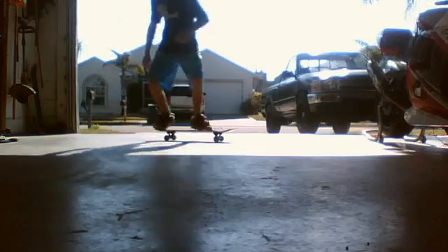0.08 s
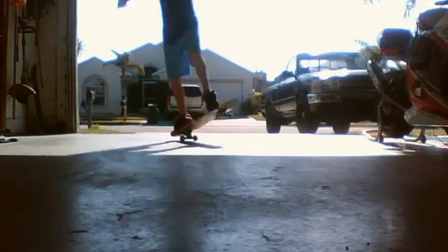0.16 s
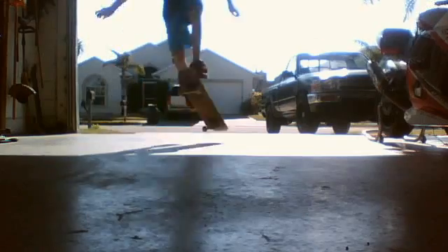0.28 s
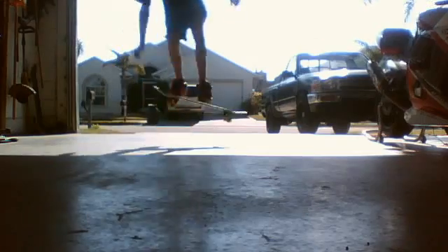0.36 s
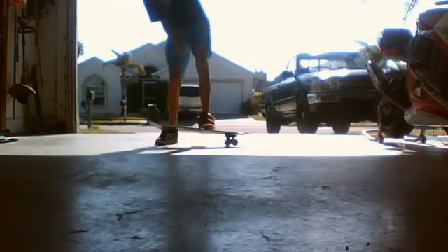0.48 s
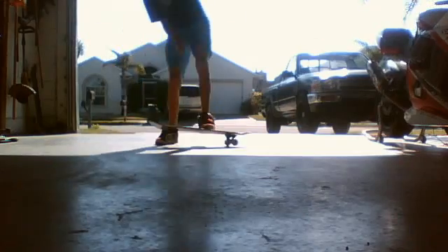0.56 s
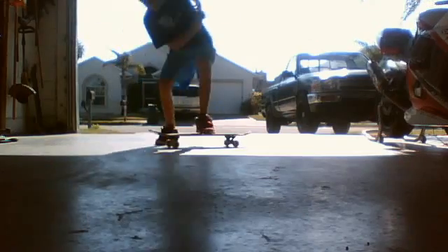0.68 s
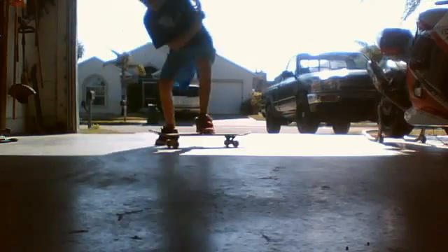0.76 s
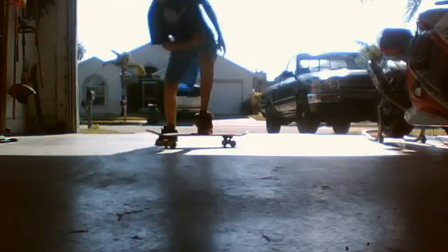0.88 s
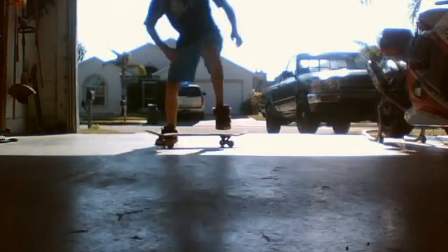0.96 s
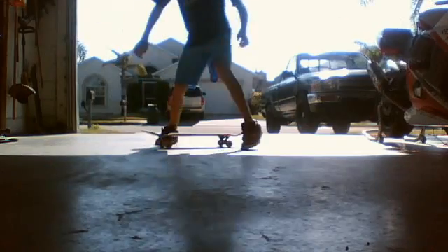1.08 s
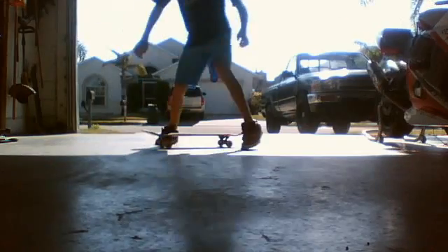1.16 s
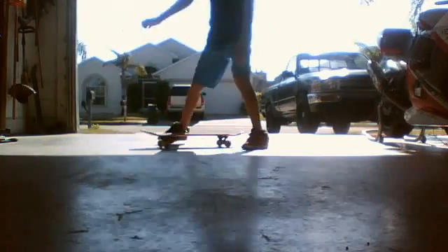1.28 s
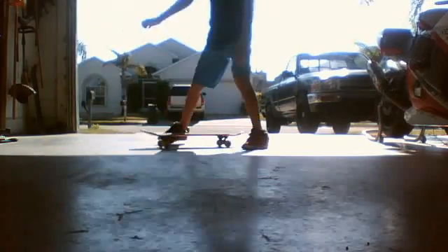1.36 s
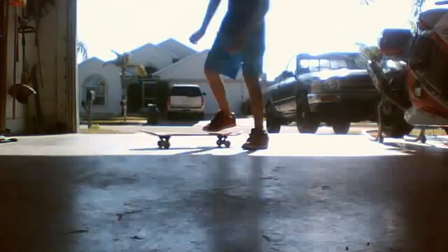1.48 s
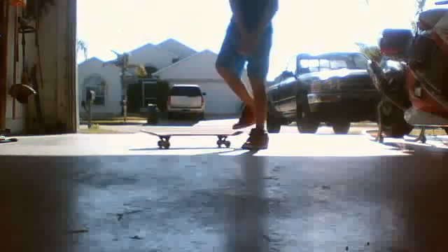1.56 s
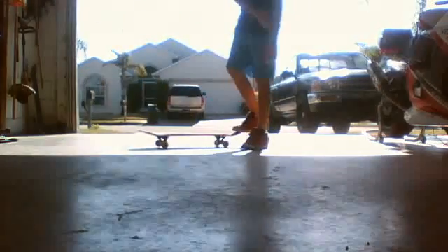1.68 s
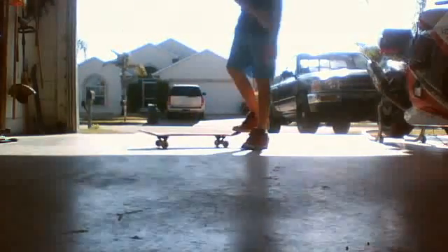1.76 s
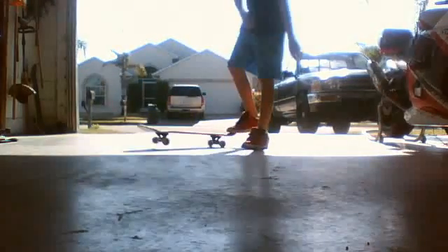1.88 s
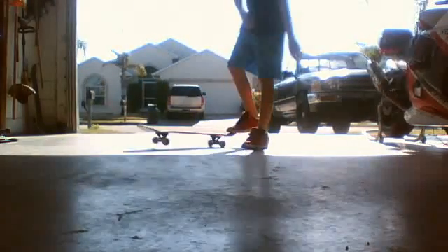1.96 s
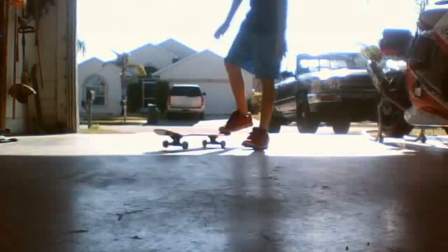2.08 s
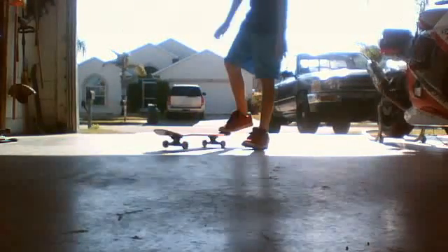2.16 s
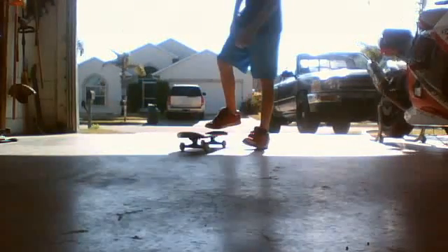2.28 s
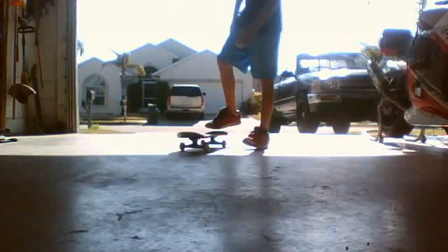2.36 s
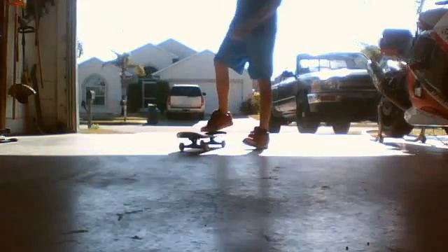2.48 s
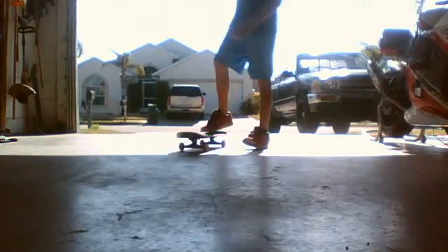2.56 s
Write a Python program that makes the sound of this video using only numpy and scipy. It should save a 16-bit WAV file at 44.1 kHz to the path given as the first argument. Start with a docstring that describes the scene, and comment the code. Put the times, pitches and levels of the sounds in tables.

```python
"""In an open concrete garage, a skateboard ollies: it rolls, the tail pops, the wheels slam down and clatter.
The rider steps off, scuffs the board round with a foot, and it slaps the floor once more.
Blows are filtered noise bursts plus decaying board modes; rolling and scraping are uneven, coloured noise.
The bare garage rings after each blow, the loud ones overload the microphone, and quiet outdoor air lies below."""
import sys
import numpy as np
from scipy import signal
from scipy.fft import rfft, irfft
from scipy.io import wavfile
from scipy.ndimage import uniform_filter1d

SR = 44100
rng = np.random.default_rng(int(sys.argv[2]) if len(sys.argv) > 2 else 0)


def int16_out(signal):
    """Quantize to a 16-bit WAV file."""
    q = np.round(np.clip(np.atleast_2d(signal).T, -1, 1) * 32767)
    wavfile.write(sys.argv[1], SR, q.astype(np.int16))


N = 114660  # length in samples, 2.6 s


def undb(db):
    """Decibels to gain."""
    return 10 ** (np.asarray(db) / 20)


def unit(x):
    """Scale to unit energy."""
    return x / np.sqrt(np.sum(x ** 2) + 1e-18)


def at(hz, table):
    """Read a table on a log-frequency axis."""
    f, v = np.array(table, float).T
    return np.interp(np.log(np.maximum(hz, 1)), np.log(f), v)


def swell(table):
    """Gain from a curve of seconds and dB, silent outside it."""
    s, db = np.array(table).T
    return np.interp(np.arange(N) / SR, s, undb(db), left=0, right=0)


def through(x, impulse):
    """Pass a sound through an impulse response, keeping its length."""
    return signal.fftconvolve(x, impulse)[:len(x)]


def response(colour, bright_hz=SR, size=2048):
    """Minimum-phase, unit-energy impulse response of a colour, dulled above bright_hz."""
    f = np.arange(size // 2 + 1) * SR / size
    gain = undb(at(f, colour)) / np.hypot(1, f / bright_hz)
    # Folding the cepstrum forward in time puts the energy right at the onset
    cepstrum = irfft(np.log(gain))
    cepstrum[1:size // 2] *= 2
    cepstrum[size // 2 + 1:] = 0
    return unit(irfft(np.exp(rfft(cepstrum))))


def add(out, s, x):
    """Mix a sound in at s seconds."""
    i = max(int(s * SR), 0)
    out[i:i + len(x)] += x[:N - i]


def blows(rows, colour, ring_db, chatter_db):
    """Each blow is a sharp push and a chatter of contacts, and rings the board, at a slightly new pitch each time."""
    # Modes of the board. Each row: frequency in Hz, relative level in dB, t60 in seconds
    modes = [(332.5, 5.5, 0.11), (570, -0.5, 0.086), (727, -4, 0.12), (790.2, 1, 0.2), (1097, 7, 0.073),
             (1589, -4, 0.1)]
    contact_rise_s = 0.0011
    out, t = np.zeros(N), np.arange(SR // 2) / SR
    rise = 1 - np.exp(-t / contact_rise_s)
    span = np.sqrt(.05 * SR)  # a 0 dB knock has unit RMS over 50 ms
    for s, db, bright_hz, chatter_s in rows:
        push = undb(chatter_db) * rng.standard_normal(len(t)) * np.exp(-t / chatter_s) * rise
        push[0] += 1
        knock = unit(through(push, response(colour, bright_hz)))
        ring = np.zeros(len(t))
        for hz, mode_db, t60 in modes:
            # Pitch and level of every mode are drawn afresh for each blow
            shifted_hz = hz * (1 + .025 * rng.standard_normal())
            envelope = undb(mode_db + 2 * rng.standard_normal() - 60 * t / t60)
            ring += envelope / np.hypot(1, hz / bright_hz) * np.sin(2 * np.pi * shifted_hz * t)
        add(out, s, span * undb(db) * (knock + undb(ring_db) * unit(ring * rise ** 2)))
    return out


def grains(colour, rough):
    """Dense contacts, more uneven in size the rougher the concrete, as coloured noise of unit RMS."""
    x = rng.standard_normal(N) * np.exp(rough * rng.standard_normal(N))
    return unit(through(x, response(colour))) * np.sqrt(N)


def grazes(rows, colour):
    """Short scrapes of grains, each starting at full level and falling along a bell curve."""
    level, t = np.zeros(N), np.arange(SR // 5) / SR
    for s, db, decay_s in rows:
        add(level, s, undb(db) * np.exp(-(t / decay_s) ** 2))
    return grains(colour, rough=0.17) * level


def landings():
    """Wheels clatter as the board comes down flat: low, dull knocks over the ringing board."""
    # Each row: start in seconds, level in dB, contact brightness in Hz, chatter decay in seconds
    wheel_hits = [(.512, 1, 1220, 0.004), (.537, 3.5, 1300, 0.0066), (.562, -4, 2030, 0.028),
                  (.612, -2.5, 2010, 0.016), (.635, -6.5, 1300, 0.0084), (.665, -8, 2980, 0.01)]
    # Colour of the wheel knocks. Each row: frequency in Hz, level in dB
    wheel_colour = [(60, -56), (140, -10), (220, -8.5), (320, -3.5), (660, 1), (1100, -3.5), (2000, -13.5),
                    (4000, -21), (8000, -32.5), (15000, -45)]
    return blows(wheel_hits, wheel_colour, ring_db=-8, chatter_db=-11)


def slaps():
    """Deck and trucks slap the floor: contacts brighter than those of the wheels."""
    # Each row: start in seconds, level in dB, contact brightness in Hz, chatter decay in seconds
    slap_hits = [(.5025, -1, 8000, 0.019), (.589, -1, 5070, 0.0096), (2.114, -16.5, 9000, 0.0074),
                 (2.122, -4.5, 6000, 0.0046), (2.136, -11, 6000, 0.006), (2.151, -7.5, 3560, 0.0062),
                 (2.19, -19, 4000, 0.008)]
    # Colour of the slaps. Each row: frequency in Hz, level in dB
    slap_colour = [(60, -59.5), (200, -16.5), (330, 6), (440, -11), (700, 8.5), (930, -5.5), (1650, -2.5),
                   (2300, -10.5), (2900, -12.5), (3400, -19.5), (4800, -22.5), (7000, -30), (10000, -37),
                   (15000, -65)]
    return blows(slap_hits, slap_colour, ring_db=-11.5, chatter_db=-12.5)


def pop():
    """The tail pops off the floor with strong chatter; the board grazes the concrete brightly."""
    # Tail blows. Each row: start in seconds, level in dB, contact brightness in Hz, chatter decay in seconds
    pop_hits = [(.206, -12.5, 880, 0.06), (.2305, -0.5, 7900, 0.0074), (.268, -10, 1800, 0.0012),
                (.294, -19.5, 1800, 0.0024)]
    # Colour of the tail blows. Each row: frequency in Hz, level in dB
    pop_colour = [(140, -24), (270, 2.5), (560, 3.5), (670, 2), (830, 7), (1100, -3.5), (1600, -1.5),
                  (2100, -11), (3300, -13), (6000, -30), (15000, -64)]
    # Board grazing the concrete at the pop, then a faint bright rattle after the late slap. Each row: start in
    # seconds, level in dB, decay in seconds
    graze_hits = [(.221, -14, 0.0097), (2.297, -44.5, .02)]
    # Colour of the grazes. Each row: frequency in Hz, level in dB
    graze_colour = [(500, -27), (3000, 6.5), (5200, 6), (10500, -4.5), (13000, -49)]
    return blows(pop_hits, pop_colour, ring_db=-17, chatter_db=-4.5) + grazes(graze_hits, graze_colour)


def thumps():
    """The first wheels thump down under the rider's weight: low, dull thuds with a short chatter."""
    # Each row: start in seconds, level in dB, contact brightness in Hz, chatter decay in seconds
    thump_hits = [(.422, -23, 900, 0.0089), (.4385, -5, 1100, .006), (.453, -3.5, 3020, 0.023)]
    # Colour of the thumps. Each row: frequency in Hz, level in dB
    thump_colour = [(80, -51), (220, -4), (310, 5), (520, -5), (780, -3.5), (1050, -18), (1700, -14.5),
                    (5000, -31.5), (14000, -45)]
    return blows(thump_hits, thump_colour, ring_db=-8, chatter_db=-17.5)


def rolling():
    """Wheels on uneven concrete: a wavering grind over a low rumble of the loaded wheels."""
    # Grind up to the pop. Each row: time in seconds, level in dB
    roll_curve = [(0, -35), (.08, -27.5), (.17, -28.5), (.21, -21.5), (.23, -56)]
    # Colour of the grind. Each row: frequency in Hz, level in dB
    roll_colour = [(80, -33.5), (280, -2), (600, -3), (840, -1.5), (1100, -13), (5000, -34.5), (12000, -70)]
    # Rumble. Each row: time in seconds, level in dB
    rumble_curve = [(.06, -42), (.1, -27.5), (.2, -31.5)]
    # Colour of the rumble. Each row: frequency in Hz, level in dB
    rumble_colour = [(80, -69), (185, 33), (350, -35)]
    waver_db, waver_s = -3.5, 0.023  # depth (its sign only flips the waver) and smoothing time
    waver = uniform_filter1d(rng.standard_normal(N), int(waver_s * SR))
    grind = grains(roll_colour, rough=0.62) * undb(waver_db * waver / waver.std())
    return grind * swell(roll_curve) + grains(rumble_colour, rough=0) * swell(rumble_curve)


def scuff():
    """A foot shoves the board round; the wheels catch and groan as they slip sideways, grinding grit."""
    # Wheels catching and slipping. Each row: start in seconds, level in dB before doubling
    slips = [(1.696, -21.5), (1.712, -25.5), (1.732, -21.5), (1.775, -28), (1.797, -35)]
    # Sole on the board as the push starts. Each row: start in seconds, level in dB,
    # contact brightness in Hz, chatter decay in seconds
    kick_hits = [(1.637, -38.5, 3000, 0.015), (1.649, -33, 4000, 0.0059)]
    # Colour of the sole. Each row: frequency in Hz, level in dB
    kick_colour = [(70, -48), (160, 0), (1900, -4), (2900, -17.5), (10000, -38)]
    # Wheels rubbing between the catches. Each row: time in seconds, level in dB
    rub_curve = [(1.63, -38.5), (1.72, -24), (1.8, -36), (1.84, -44)]
    # Colour of the rub. Each row: frequency in Hz, level in dB
    rub_colour = [(70, -39), (170, -18.5), (380, 5), (475, 7.5), (590, -4.5), (760, -3), (1000, -23),
                  (10000, -50)]
    # Grit scraping under the wheels. Each row: time in seconds, level in dB
    grit_curve = [(1.66, -46), (1.68, -34.5), (1.71, -44), (1.76, -36.5), (1.85, -57)]
    # Colour of the grit. Each row: frequency in Hz, level in dB
    grit_colour = [(80, -31), (500, 5.5), (1800, 4.5), (2500, -3), (4400, -1.5), (8000, -13.5),
                   (12000, -56)]
    groan_hz, groan_t60_s = 470.5, 0.066
    groan, t = np.zeros(N), np.arange(SR // 5) / SR
    decay = np.exp(-np.log(1000) * t / groan_t60_s)
    for s, db in slips:
        hz = groan_hz * (1 + .05 * rng.standard_normal())  # each slip has its own pitch
        add(groan, s, 2 * undb(db) * np.sin(2 * np.pi * hz * t) * decay)
    kick = blows(kick_hits, kick_colour, ring_db=-24, chatter_db=4)
    rub = grains(rub_colour, rough=0.38) * swell(rub_curve)
    grit = grains(grit_colour, rough=0.81) * swell(grit_curve)
    return kick + groan + rub + grit


def steps():
    """Shoes knock on the floor and the deck, and a sole scuffs as the foot comes down."""
    # Shoe knocks. Each row: start in seconds, level in dB, contact brightness in Hz, chatter decay in seconds
    shoe_hits = [(1.123, -32, 900, 0.044), (1.1955, -19, 1300, 0.00098), (1.214, -42.5, 9050, 0.015),
                 (2.107, -23.5, 1200, 0.01)]
    # Colour of the shoes. Each row: frequency in Hz, level in dB
    shoe_colour = [(60, -60), (150, -11), (270, 1), (620, 1.5), (1120, -0.5), (1400, -10), (2800, -17.5),
                   (6000, -55)]
    # Scuff of the sole. Each row: start in seconds, level in dB, decay in seconds
    sole_hits = [(1.2, -36.5, 0.035)]
    # Colour of the scuff. Each row: frequency in Hz, level in dB
    sole_colour = [(300, -47), (2100, -10), (2750, 5), (3900, -31)]
    return blows(shoe_hits, shoe_colour, ring_db=-17, chatter_db=-11) + grazes(sole_hits, sole_colour)


def ticks():
    """Faint, tiny dry pings: a high sine and an overtone just above its octave, swelling and fading at once."""
    # Each entry: start in seconds
    tick_starts = [0.133, 1.084, 1.173, 1.378, 1.533, 1.67, 1.826, 1.966, 2.413, 2.579]
    tick_hz, rise_s, tick_db, octave_db = 3190, 0.0009, -34.5, -8
    out, t = np.zeros(N), np.arange(SR // 40) / SR
    shape = t / rise_s * np.exp(1 - t / rise_s)
    for s in tick_starts:
        phase = 2 * np.pi * tick_hz * (1 + 0.011 * rng.standard_normal()) * t
        add(out, s, undb(tick_db) * shape * (np.sin(phase) + undb(octave_db) * np.sin(2.04 * phase)))
    return out


def outdoor_air():
    """The quiet air outside: steady coloured noise."""
    # Colour of the air. Each row: frequency in Hz, level in dB
    air_colour = [(85, -37.5), (125, 10), (200, 6), (400, -1.5), (850, -1), (1500, -4), (3000, -6.5),
                  (6600, -13), (9500, -27.5), (12000, -60)]
    return undb(-46) * through(rng.standard_normal(N), response(air_colour))


def garage():
    """Direct sound, early slaps off floor and walls, then a diffuse tail that dies soonest in the high treble."""
    # Decay of the garage. Each row: band centre in Hz, t60 in seconds
    decays = [(100, 0.7), (300, 0.54), (700, 0.6), (1800, 0.63), (5000, 0.5), (11000, 0.31)]
    direct_db, early_db, room_db = -7, -8.5, -7.5
    build_s, early_s = 0.0039, 0.027  # build-up of the echoes, fading of the early ones
    t = np.arange(SR) / SR
    noise = rfft(rng.standard_normal(SR))
    f, tail = np.arange(len(noise)), 0  # one second of noise, so bins are 1 Hz apart
    for hz, t60 in decays:
        # Overlapping bands that sum to one
        share = at(f, [(h, float(h == hz)) for h, _ in decays])
        tail = tail + irfft(noise * share) * np.exp(-np.log(1000) * t / t60)
    build = 1 - np.exp(-(t / build_s) ** 2)
    # Sparse echoes, about 900 a second
    early = rng.standard_normal(SR) * (rng.random(SR) < 900 / SR) * np.exp(-t / early_s)
    room = undb(room_db) * unit(tail * build) + undb(early_db) * unit(early * build)
    room[0] += undb(direct_db)
    return room


def scene():
    """Board and rider, each group of sounds with its own echoes of the garage, over dry ticks and outdoor air."""
    sources = [landings(), slaps(), pop(), thumps(), scuff() + rolling(), steps()]
    in_garage = sum(through(source, garage()) for source in sources)
    return (in_garage + ticks() + outdoor_air())[None]


def record(dry):
    """The microphone input clips the loud blows flat; the treble droops and the top is cut."""
    clip_level, knee = 0.72, 10
    droop_hz, top_hz = 9600, 15800
    clipped = dry / (1 + np.abs(dry / clip_level) ** knee) ** (1 / knee)
    pole = np.exp(-2 * np.pi * droop_hz / SR)
    dulled = signal.lfilter([1 - pole], [1, -pole], clipped)
    top_cut = signal.ellip(8, .2, 70, top_hz, fs=SR, output="sos")
    return signal.sosfilt(top_cut, dulled)


dry = scene()
out = record(dry)
int16_out(out)
```